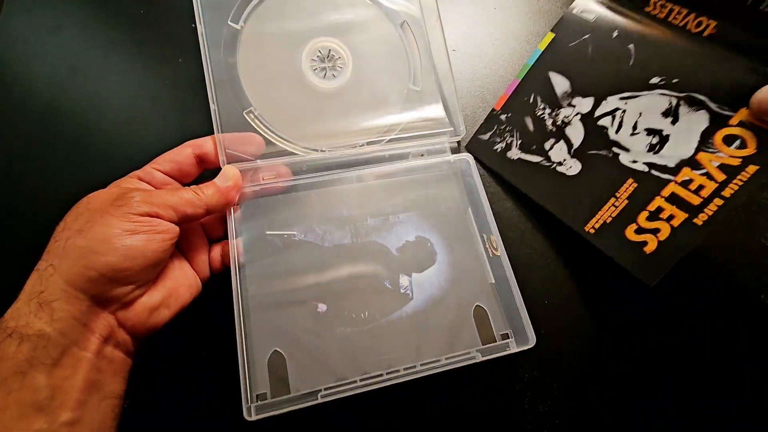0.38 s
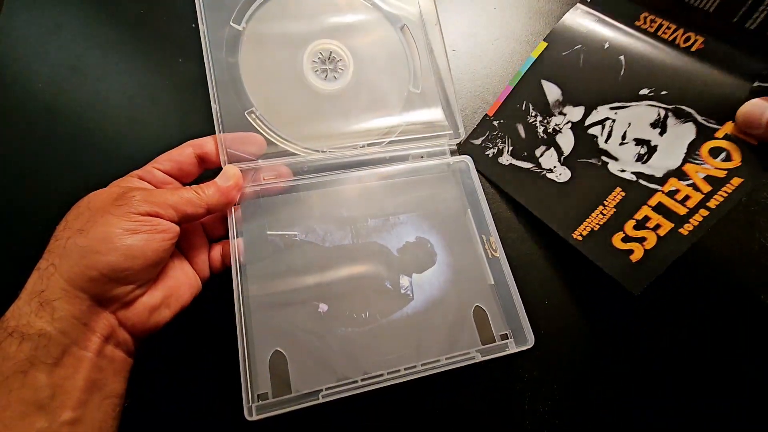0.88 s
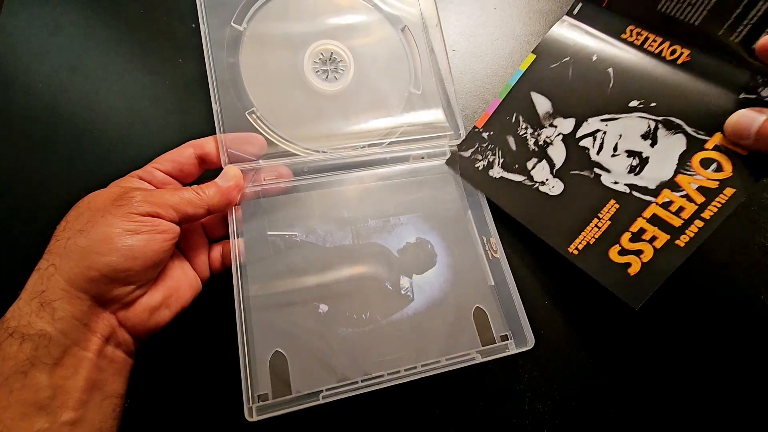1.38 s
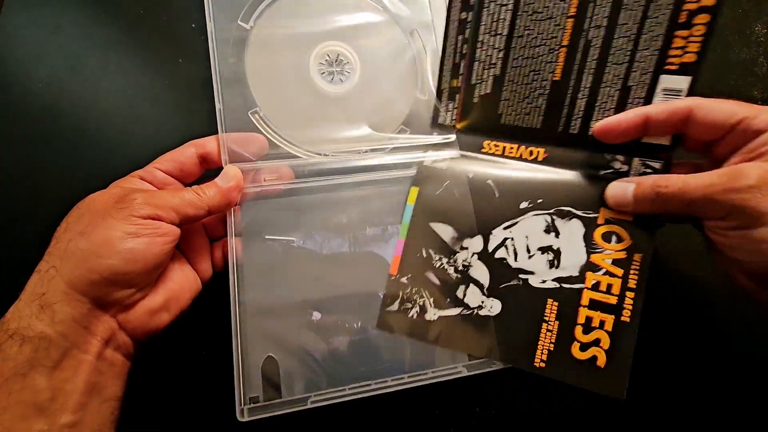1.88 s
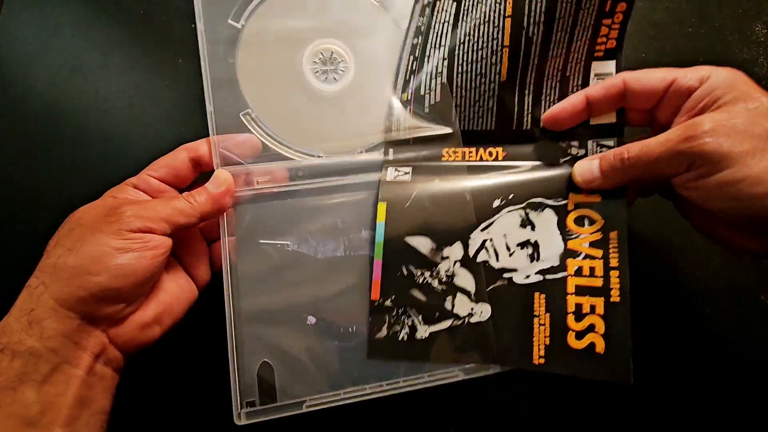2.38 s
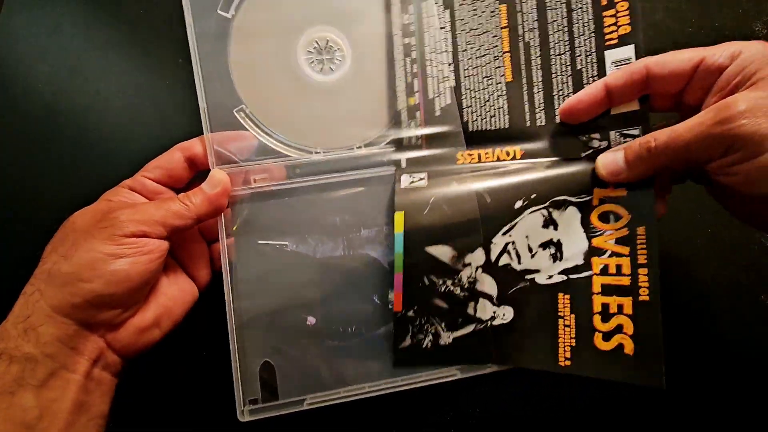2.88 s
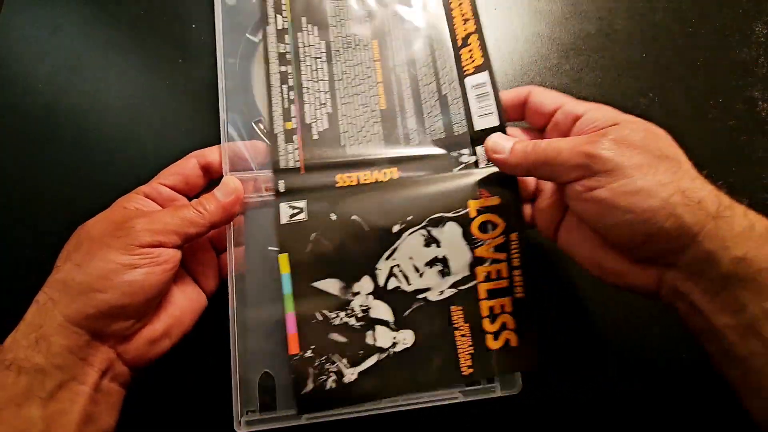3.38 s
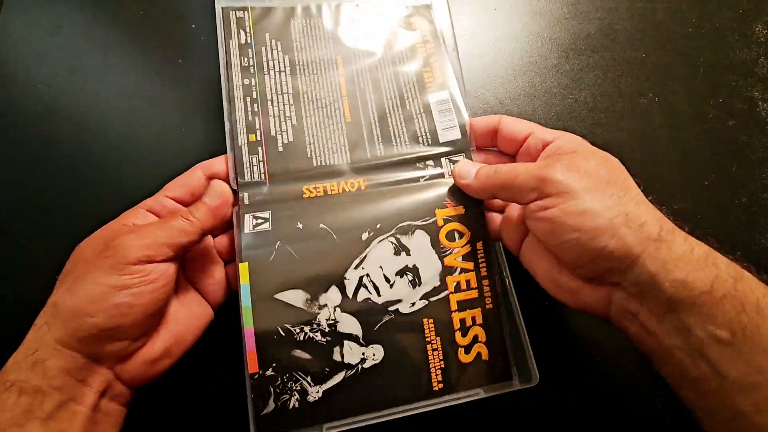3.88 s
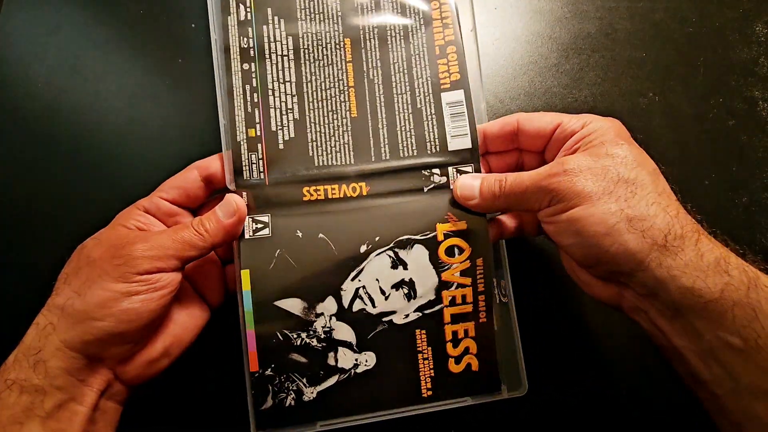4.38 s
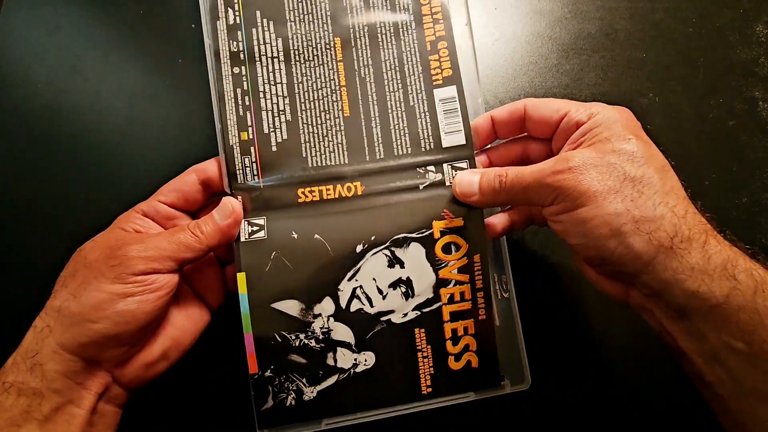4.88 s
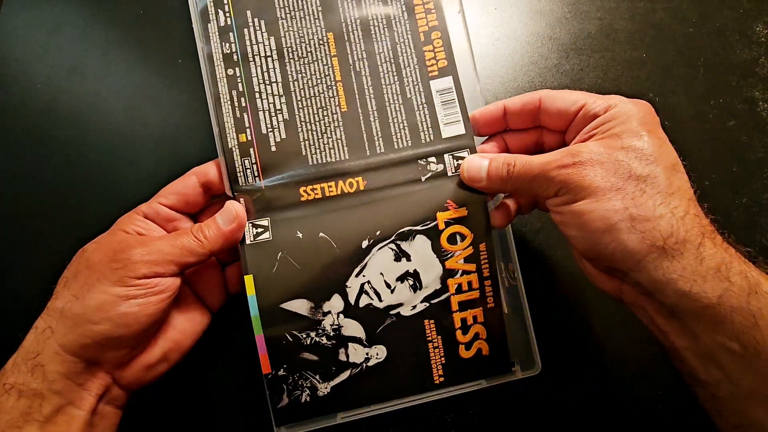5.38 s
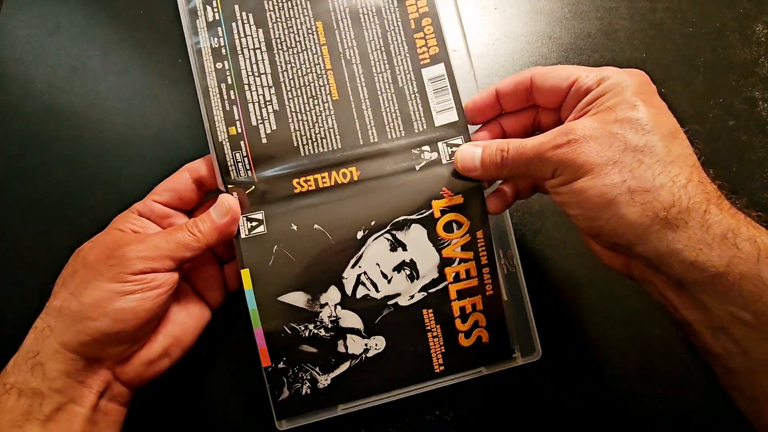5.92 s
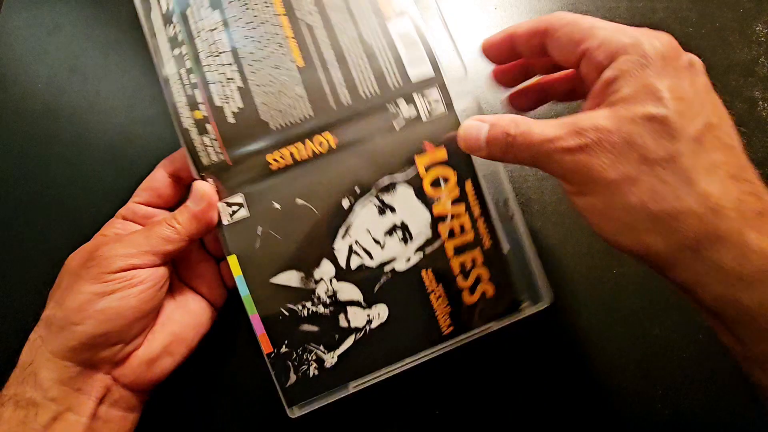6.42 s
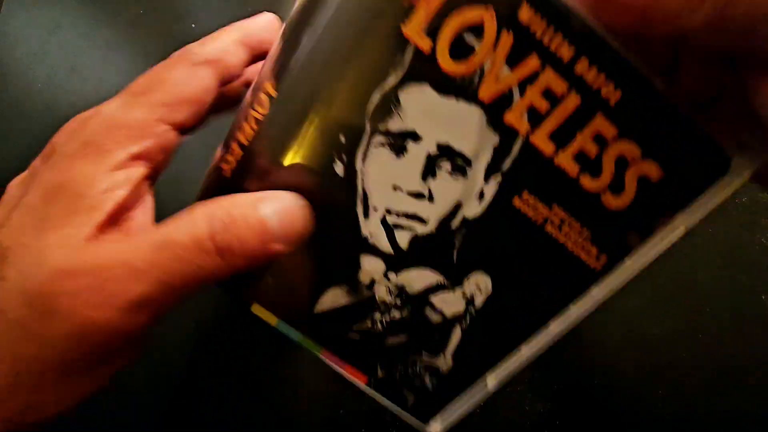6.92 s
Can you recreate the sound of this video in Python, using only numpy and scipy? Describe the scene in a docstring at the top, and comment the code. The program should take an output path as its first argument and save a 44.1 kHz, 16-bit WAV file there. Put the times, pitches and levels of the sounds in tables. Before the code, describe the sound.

A quiet small room with low airy noise, faint mains hum and a short reverberation; the plastic case is very close, in wide stereo leaning slightly left. From 0 to 1.7 s, a soft paper hiss, brief rasp and scattered small ticks sound over a faint engine hum that drops in pitch near 0.8 s and fades before 3 s. At about 1.9 s the sheet starts sliding briskly; bright swishes, scuffs and dry clicks cluster through 2.8 s. Much louder, hard plastic snaps come at 3.03 to 3.23 s, the last sharpest, with rushing paper friction until 3.6 s. A firm click at 3.94 s leads to soft rubbing. From 4.5 to 6.3 s only faint strokes, tiny ticks and a weak low drone remain. Clicks gather from 6.4 s, with a hollow knock and low thump near 6.8 s and a rough scuff at 6.93 s.

```python
"""A glossy sheet is slid under the clear sleeve of a plastic disc case, held close to a stereo microphone.
At first the sheet hisses and rasps by friction, over a rumble and the harmonics of an engine slowing down.
Clicks, resonances of the case struck by brief forces, crowd together after 2 s and peak from 3 to 4 s.
Then come sparse strokes and a faint drone; from 6.3 s clicks and scuffs gather again until the end.
A quiet room lies behind it all: low-pitched air noise, mains hum, surface bounces and a short reverberation."""
import sys
import numpy as np
from scipy import signal
from scipy.fft import rfft, irfft
from scipy.io import wavfile
from scipy.ndimage import uniform_filter1d

SR = 44100
rng = np.random.default_rng(int(sys.argv[2]) if len(sys.argv) > 2 else 0)


def transcribe(signal):
    """Save signal, clipped to [-1, 1], as a 16-bit WAV file at the path in sys.argv[1]."""
    frames = np.atleast_2d(signal).T
    limited = np.clip(frames, -1, 1)
    pcm = np.round(limited * 32767).astype(np.int16)
    wavfile.write(sys.argv[1], SR, pcm)


def field_ratio(decibels):
    """Amplitude ratio for a level in dB (20 dB per decade); scalars and array-likes work."""
    return 10 ** (np.asarray(decibels, dtype=float) / 20)


N = 310023  # samples

# Spectrum of the room's air noise: frequency_hz, density_db (relative, per Hz)
AIR_SPECTRUM = [(15, -43), (30, -4), (55, 2), (92, -7), (123, -4), (141, -16), (195, -13.5), (229, -7.5),
                (293, -14.5), (354, -17.5), (560, -23), (860, -30), (1700, -41), (3000, -46.5), (5000, -49),
                (7000, -64), (16000, -80)]
# Left-right likeness of the room noise: frequency_hz, likeness (0 to 1)
AIR_LIKENESS = [(60, 0.99), (240, 0.89), (950, 0.072), (3770, 0.085), (15000, 0.0045)]
AIR_DB, AIR_PAN_DB = -52, 1.26  # rms level before panning; left over right
# Low rumble through the hands and the building: time_s, level_db
RUMBLE_LEVEL = [(0.0, -51), (0.49, -58), (0.8, -60), (1.72, -60.5), (2.15, -48), (2.74, -56), (3.21, -52),
                (3.5, -75.5), (4.68, -78), (6.72, -78), (6.83, -48), (7.03, -55.5)]
# Spectrum of that rumble: frequency_hz, density_db (relative, per Hz)
RUMBLE_SPECTRUM = [(70, -16), (140, 14), (250, 14.5), (400, -2.5), (700, -39)]
MAINS_HZ, MAINS_DB = 120.8, -60
# Lowest cycle of a distant engine slowing down: time_s, cycle_hz
ENGINE_SPEED = [(0, 28), (.7, 28.1), (.95, 26.22), (2.5, 23.76), (3, 23.75)]
# Multiples of that cycle that reach the room, one per row of ENGINE_TONES: multiple (no unit)
ENGINE_MULTIPLES = [5, 6, 7, 8, 9, 3, 7, 2, 10, 11]
# When and how strongly each multiple sounds: start_s, end_s, level_db
ENGINE_TONES = [(0.072, 0.74, -57), (0.058, 0.84, -70), (.1, 0.65, -69), (.2, 0.684, -62),
                (0, 0.653, -58.5), (.75, 2.54, -51), (0.84, 2.89, -61.5), (1.4, 2.24, -53.5), (1, 1.6, -63),
                (1.9, 2.2, -57)]
# One faint later drone: start_s, end_s, first_pitch_hz, last_pitch_hz, level_db
LATE_DRONE = (4.5, 6.5, 222.5, 228.5, -62)
DRONE_WAVER_DB = 1.5  # rms wander of the engine tones and the drone
# Reverberation time of the room: frequency_hz, t60_s
ROOM_DECAY = [(300, 0.25), (700, 0.12), (1800, 0.14), (4600, 0.24), (12000, 0.23)]
# Table and nearby surfaces: delay_ms, level_db (against the direct sound)
BOUNCES = [(4.6, -21), (9.2, -13), (21., -24.5)]
# The case bows in the hand and pushes air: start_s, pitch_hz, peak_db, length_s
BOWS = [(.92, 81.4, -39, 0.078), (6.661, 69.6, -32, 0.051), (6.828, 97, -41, 0.042)]
# An edge catches and drags: start_s, length_s, level_db (rms before the taper), centre_hz, width_hz
SCUFFS = [(0.612, 0.051, -58, 1100, 850), (1.37, 0.031, -48, 830, 1510), (1.409, 0.38, -58.5, 1580, 500),
          (1.359, 0.013, -51.5, 900, 1200), (1.881, 0.095, -49.5, 340, 195),
          (3.172, 0.025, -45, 1007, 1203), (6.803, 0.094, -45, 330, 350), (1.938, 0.1, -42, 3400, 1800),
          (2.023, 0.028, -36, 676, 895), (2.222, 0.061, -45.5, 880, 776), (2.328, 0.043, -48, 1090, 1510),
          (2.759, 0.028, -39, 840, 880), (2.783, 0.012, -38, 1100, 1100), (2.823, 0.0048, -49, 4750, 1497),
          (2.854, 0.029, -41, 1100, 1200), (3.38, 0.034, -46.5, 1100, 1620),
          (6.725, 0.032, -48.5, 2290, 2500), (6.926, 0.032, -38.5, 600, 1175),
          (6.93, 0.018, -36.5, 2860, 2440)]
# Left-right likeness of the wide case: frequency_hz, likeness (0 to 1)
CASE_LIKENESS = [(200, 0.88), (640, 0.85), (1400, 0.3), (3000, .2), (7000, 0.15)]
# Where the case is held: time_s, right_lag_ms (negative: the right side hears it earlier)
HOLD_LAG = [(0, 0), (2.1, -.07), (3.2, -.05), (3.22, .09), (3.9, .3), (5., .27), (6.3, .15), (6.8, .05),
            (7.03, .05)]
# Clicks: contact_s, snap_peak_db, knock_db and tick_db (both against the snap), snap_centre_hz
CLICKS = [(0.0135, -33.5, -16, 1.5, 2600), (.0464, -43, -4, -28, 2560), (0.538, -38, -7, 1.5, 1570),
          (.9262, -50.5, 8.5, -22, 1630), (1.0836, -47.5, -3, -24, 2870), (1.2086, -39, -3, -3.5, 1580),
          (1.277, -48.5, 5, 10, 1415), (1.3666, -37.5, 4.5, 7, 1810), (1.8882, -34, 4.5, -6, 2070),
          (1.9246, -33.5, -1.5, 2.5, 1660), (2.144, -30, 1.5, -26, 2080), (2.161, -34.5, -0.5, -8, 3930),
          (2.1983, -34, 4, -6, 3280), (2.2224, -30.5, 3, 12, 1940), (2.236, -45, 17.5, -25, 1540),
          (2.2717, -31, -1.5, 2, 3000), (2.317, -29, -6, -16, 3200), (2.362, -36, 3, -25, 2300),
          (2.5317, -30, -3.5, 0.5, 2900), (2.5847, -32, -1.5, -33, 1930), (2.6793, -41.5, 0.5, -24, 2330),
          (2.987, -39.5, -1.5, 4, 3360), (3.0323, -16.5, -7, -13, 3180), (3.0637, -12.5, -2, -2, 1580),
          (3.1929, -12, -4, -44, 2130), (3.2281, -4.5, -7.5, 0, 2152), (3.8703, -39, -21.5, -4, 1556),
          (3.887, -42, -13, -20, 1940), (3.9369, -16.5, -0.5, -9, 1620), (4.058, -26.5, -5.5, -38, 1640),
          (4.143, -35.5, -0.5, -26, 1630), (4.7722, -46.5, -11.5, -32, 1473),
          (4.9518, -53.5, -4, 6.5, 1960), (4.9835, -38, -15, -6.5, 3490),
          (5.206, -37.5, -35.5, -22.5, 1560), (5.5564, -45.5, 3, -11.5, 2000),
          (6.3066, -50.5, -21.5, -7.5, 2180), (6.3835, -24.5, -17.5, -6.5, 2882),
          (6.4204, -18, -7, -17, 2230), (6.456, -27.5, -10, -11, 3020), (6.4918, -31, -8, -34, 3240),
          (6.5422, -38, -3.5, -11, 2400), (6.6033, -45, -7, -31.5, 2740), (6.655, -35, -12, -35, 2980),
          (6.673, -36, -4, -25, 3730), (6.7129, -45, 5.5, -13, 1840), (6.8036, -16.5, 7, -6.5, 1860),
          (6.8661, -24.5, -6.5, -4, 3260), (6.8902, -31, -8, -6, 3180), (6.9929, -34.5, -9, 2, 3070),
          (7.0122, -32, -21, -25, 3000)]
# Mean modes of the plastic case: pitch_hz, level_db, t60_s
CASE_MODES = [(433, -19, 0.06), (553, -17.5, 0.035), (592.6, -7, 0.016), (830, -5.5, 0.067),
              (1100, -3.5, 0.04), (1400, -2.5, 0.012), (1460, -15.5, 0.012), (2130, -13, 0.015),
              (2600, -14, 0.0018), (3200, -4, .008), (4400, -2, 0.01), (5563, -5, .006), (6910, -13, .005)]
SHIVER_DB, SHIVER_T60_S = -4, 0.048  # small modes of walls and sleeve, too dense to tell apart
CONTACT_MS, CRACK_DB = 0.6, 38.5  # decay constant of the force; bare contact ahead of the ringing
THUD_DB = -14  # low push through the hands, against the knock
LEAD = 60  # samples kept free ahead of each contact
CLICK_PAN_DB, PAN_SCATTER_DB = 5, 3  # mean left over right, and its spread
# Spectrum of the paper hiss: frequency_hz, density_db (relative, per Hz)
HISS_SPECTRUM = [(1500, -31.5), (2800, -4), (4000, 3), (6000, 0.5), (8000, 1), (10500, -8.5), (12000, -5.5),
                 (14000, -9.5), (16300, -12.5)]
# Spectrum of the wall rasp: frequency_hz, density_db (relative, per Hz)
RASP_SPECTRUM = [(250, -29.5), (450, -14), (800, -10.5), (1600, -14.5), (2600, -16.5), (5000, -43.5)]
# The sheet dragging along inside the sleeve: time_s, hiss_db, rasp_db
DRAG = [(0, -67, -70), (.35, -90, -85), (.55, -77, -71), (.8, -105, -103), (1.05, -78.5, -76),
        (1.3, -85.5, -78), (1.45, -74.5, -66), (1.58, -62.5, -58), (1.69, -49, -64), (1.85, -48, -51),
        (2.12, -64.5, -59.5), (2.3, -62, -57), (2.43, -61, -56), (2.62, -61, -61), (2.94, -58, -59.5),
        (3.12, -48, -51), (3.31, -46.5, -51.5), (3.6, -51.5, -61), (3.64, -62.5, -58), (3.8, -75.5, -71.5),
        (4., -75, -56), (4.15, -89, -70.5), (4.77, -89, -74), (5.4, -100, -81.5), (6.28, -100, -78),
        (6.33, -76, -74), (6.45, -66.5, -66), (6.8, -78, -79), (7.03, -59, -50.5)]
# Single pushes of the sheet: peak_s, swell_s, fade_s, hiss_db, rasp_db
STROKES = [(0.02, 0.076, .12, -56.5, -55.5), (0.21, 0.061, 0.058, -44.5, -57),
           (0.657, 0.17, 0.049, -69.5, -72), (0.916, 0.017, 0.043, -63, -57.5),
           (1.05, 0.099, 0.045, -66.5, -73), (1.131, 0.075, .055, -61.5, -56),
           (1.929, 0.0041, 0.25, -40, -44.5), (2.022, 0.075, 0.025, -32, -81),
           (2.182, 0.033, 0.052, -41.5, -61), (2.366, 0.092, 0.052, -44, -73),
           (2.541, 0.54, 0.042, -62, -62.5), (2.777, 0.1, 0.018, -51, -60),
           (2.823, 0.0063, 0.056, -35, -57.5), (3.233, 0.003, 0.12, -42.5, -50),
           (3.878, 0.046, 0.21, -57, -58.5), (4.24, 0.1, 0.027, -52, -62), (4.34, 0.05, 0.1, -56, -64),
           (4.575, 0.083, 0.091, -62.5, -60.5), (4.99, .4, .1, -73, -77.5), (5.212, .05, .13, -71, -65.5),
           (6.548, 0.033, 0.043, -68, -71.5), (6.662, 0.02, 0.085, -70, -81.5),
           (6.736, .06, 0.031, -51, -51), (6.881, 0.2, 0.094, -54, -52), (6.941, 0.031, 0.068, -47, -44)]
STROKE_DB = 25  # rise over one swell_s, fall over one fade_s
JOLT_HISS_DB, JOLT_HISS_FADE_S = -25, 0.04  # sheet jolted by a click, against its tick
JOLT_RASP_DB, JOLT_RASP_FADE_S = -24, 0.065  # walls jolted by a click, against its knock
JOLT_DELAY_S = 0.002  # from the click to the peak of its jolt
SLIDE_PAN_DB = 1.5  # left over right
EDGE_HZ = 15900  # upper band limit


def evened(x):
    """Normalises a signal to unit rms."""
    return x / np.sqrt(np.mean(x ** 2) + 1e-20)


def read(points, hz):
    """Interpolates a spectrum table linearly along a logarithmic frequency axis."""
    f, value = np.transpose(points)
    return np.interp(np.log(hz + 1), np.log(f + 1), value)


def add(mix, s, sound):
    """Superposes a sound on the mix from time s."""
    part = mix[:, round(s * SR):][:, :sound.shape[-1]]
    part += sound[..., :part.shape[1]]


def sides(pan_db):
    """Places a source by intensity stereo: a column of left and right gains."""
    return field_ratio([pan_db / 2, -pan_db / 2])[:, None]


def correlated(left, other, alike):
    """Sets interchannel coherence by blending an independent spectrum into the right side."""
    return np.array([left, alike * left + np.sqrt(1 - alike ** 2) * other])


def noise(spectrum, likeness, patchy_db, size):
    """Shapes random short-time spectra into stereo noise whose level drifts in small patches."""
    frames, hz = 4 * N // size + 5, np.fft.rfftfreq(size, 1 / SR)
    a, b, c, d, patches = rng.standard_normal((frames, len(hz), 5)).T
    patches = uniform_filter1d(patches, size=5, axis=0)  # across frequency
    patches = evened(uniform_filter1d(patches, size=24, axis=1))  # across time
    alike = np.clip(read(likeness, hz), -1, 1)[:, None]
    spectra = correlated(a + 1j * b, c + 1j * d, alike)
    spectra = spectra * field_ratio(read(spectrum, hz)[:, None] + patchy_db * patches)
    sound = signal.istft(spectra, nperseg=size, noverlap=size * 3 // 4)[1]
    return evened(sound[:, :N])


def drone(start, end, hz, db, waver):
    """Integrates the pitch curve hz into phase: a wavering tone that fades in and out."""
    a, b = round(start * SR), round(end * SR)
    tone = np.sin(2 * np.pi * np.cumsum(hz[a:b]) / SR) * signal.windows.tukey(b - a, 0.2)
    own_waver = np.roll(waver, rng.integers(N))[a:b]
    return start, np.sqrt(2) * field_ratio(db + DRONE_WAVER_DB * own_waver) * tone


def room_tone():
    """Superposes broadband air noise and rumble with the periodic tones of mains and engine."""
    t = np.arange(N) / SR
    out = field_ratio(AIR_DB) * noise(AIR_SPECTRUM, AIR_LIKENESS, patchy_db=1.5, size=4096)
    rumble = noise(RUMBLE_SPECTRUM, AIR_LIKENESS, patchy_db=8.0, size=2048)
    out += field_ratio(np.interp(t, *np.transpose(RUMBLE_LEVEL))) * rumble
    waver = uniform_filter1d(rng.standard_normal(N), size=3000)
    waver = evened(uniform_filter1d(waver, size=3000))
    out += field_ratio(MAINS_DB + 0.56 * waver) * np.sqrt(2) * np.sin(2 * np.pi * MAINS_HZ * t)
    engine_hz = np.interp(t, *np.transpose(ENGINE_SPEED))
    for multiple, (start, end, db) in zip(ENGINE_MULTIPLES, ENGINE_TONES):
        add(out, *drone(start, end, multiple * engine_hz, db, waver))
    start, end, first_hz, last_hz, db = LATE_DRONE
    add(out, *drone(start, end, np.interp(t, (start, end), (first_hz, last_hz)), db, waver))
    return out * sides(AIR_PAN_DB)


def room(x):
    """Reverberation by sparse reflections of random sign, each band decaying at its own rate."""
    taps = np.zeros((2, SR // 2))
    at = np.arange(150, SR // 2 - 20, 20)
    at = at + rng.integers(0, 20, (2, len(at)))
    np.put_along_axis(taps, at, rng.choice([-1., 1.], at.shape), 1)
    hz, t, spectra = signal.stft(taps, SR, nperseg=128)
    decay = field_ratio(-60 * t / read(ROOM_DECAY, hz)[:, None])
    tail = signal.istft(spectra * decay, SR, nperseg=128)[1]
    return signal.fftconvolve(x, tail / np.linalg.norm(tail[0]), axes=1)[:, :N]


def bows():
    """Volume displacement: the flexing case pushes a few slow cycles of air."""
    out = np.zeros((2, N))
    for s, hz, db, length in BOWS:
        t = np.arange(round(length * SR)) / SR
        add(out, s, field_ratio(db) * np.hanning(len(t)) * np.sin(2 * np.pi * hz * t))
    return out


def scuffs():
    """Stick-slip: a quick run of slips filtered by one broad resonance of the dragging edge."""
    out = np.zeros((2, N))
    for s, length, db, centre_hz, width_hz in SCUFFS:
        n = round(length * SR)
        hz = np.fft.rfftfreq(n, 1 / SR)
        alike = np.clip(read(CASE_LIKENESS, hz) + 0.037, 0, 1)
        left, other = rfft(rng.standard_normal((2, n)))
        resonance = 1 / (1 + ((hz - centre_hz ** 2 / (hz + 1)) / width_hz) ** 2)
        slips = irfft(resonance * correlated(left, other, alike), n)
        add(out, s, field_ratio(db) * evened(slips) * signal.windows.tukey(n, 0.4))
    return out * sides(SLIDE_PAN_DB)


def contact_force(t):
    """Impact excitation: spectra of two brief rattles of force with a flattened envelope."""
    force = rng.standard_normal((2, len(t))) * np.exp(-1000 * t / CONTACT_MS)
    force *= np.minimum(t / 0.00021, 1)  # quick onset
    spectrum = rfft(np.roll(force, LEAD, axis=1))
    return spectrum / uniform_filter1d(abs(spectrum), size=60)  # a hard contact pushes evenly at all pitches


def case_ring(t):
    """Modal superposition: decaying modes of the case, detuned and reweighted by each grip."""
    ring = field_ratio(SHIVER_DB - 60 * t / SHIVER_T60_S) * rng.standard_normal(len(t))
    for hz, db, t60 in CASE_MODES:
        level_shift, detune = rng.standard_normal(2)
        decay = field_ratio(db + 2 * level_shift - 60 * t / t60)
        ring += decay * np.cos(2 * np.pi * hz * (1 + 0.04 * detune) * t)
    ring[0] += field_ratio(CRACK_DB)
    return ring


def bandpass(low_hz, high_hz):
    """Second-order Butterworth resonance between two edge frequencies."""
    return signal.butter(2, (low_hz, high_hz), "band", fs=SR, output="sos")


def clicks():
    """Convolves contact force with case ringing and weighs it in bands: thud, knock, snap and tick."""
    t, out = np.arange(3072) / SR, np.zeros((2, N))
    alike = np.clip(read(CASE_LIKENESS, np.fft.rfftfreq(len(t), 1 / SR)) + 0.5, 0, 1)
    thud, knock, tick = bandpass(40, 360), bandpass(560, 1600), bandpass(3200, 7500)
    for s, snap_db, knock_db, tick_db, snap_hz in CLICKS:
        pan = sides(CLICK_PAN_DB + PAN_SCATTER_DB * rng.standard_normal())
        left, other = contact_force(t) * rfft(case_ring(t))
        both = irfft(correlated(left, other, alike))
        bands = [(thud, snap_db + knock_db + THUD_DB), (knock, snap_db + knock_db),
                 (bandpass(snap_hz / 1.3, snap_hz * 1.3), snap_db), (tick, snap_db + tick_db)]
        for band, db in bands:
            part = signal.sosfilt(band, both)
            part = part / abs(part).max(1)[:, None]  # unit peak on each side
            add(out, s - LEAD / SR, field_ratio(db) * pan * part)
    return out


def push(s, swell_s, fade_s, db):
    """Exponential growth and decay of friction: start time and gains of one push peaking at s."""
    start = max(s - 2 * swell_s, 0)
    t = np.arange(start - s, 2 * fade_s, 1 / SR)
    drop_db = STROKE_DB * np.where(t < 0, -t / swell_s, t / fade_s)
    return start, field_ratio(np.array(db)[:, None] - drop_db)


def friction():
    """Sums the gains of hiss and rasp from slow drag, single pushes and a jolt after every click."""
    time, *columns = np.transpose(DRAG)
    level = field_ratio([np.interp(np.arange(N) / SR, time, column) for column in columns])
    for s, swell_s, fade_s, *db in STROKES:
        add(level, *push(s, swell_s, fade_s, db))
    for s, snap_db, knock_db, tick_db, _ in CLICKS:
        peak_s, swell_s = s + JOLT_DELAY_S, JOLT_DELAY_S / 2
        add(level[:1], *push(peak_s, swell_s, JOLT_HISS_FADE_S, [snap_db + tick_db + JOLT_HISS_DB]))
        add(level[1:], *push(peak_s, swell_s, JOLT_RASP_FADE_S, [snap_db + knock_db + JOLT_RASP_DB]))
    return level


def grit(smooth_s, depth_db):
    """Uneven grip: amplitude modulation by quick random jumps in contact force."""
    jumps = uniform_filter1d(rng.exponential(1, N) ** 3, size=max(2, round(smooth_s * SR)))
    return evened(field_ratio(depth_db * np.clip(evened(jumps - jumps.mean()), -3, 3)))


def slide():
    """Sliding friction of paper on plastic: fine hiss of the sheet, lumpier rasp of the walls."""
    hiss_gain, rasp_gain = friction()
    sheet = noise(HISS_SPECTRUM, CASE_LIKENESS, patchy_db=1.5, size=256)
    treble = signal.sosfilt(signal.butter(2, 10500, "high", fs=SR, output="sos"), sheet)
    # louder hiss is brighter, as when the sheet slides faster
    treble_db = np.clip(0.06 * (20 * np.log10(hiss_gain) + 53), -15, 8)
    sheet = sheet + (field_ratio(treble_db) - 1) * treble
    hiss = hiss_gain * grit(0.0065, depth_db=2.8) * sheet
    walls = noise(RASP_SPECTRUM, CASE_LIKENESS, patchy_db=2.5, size=512)
    rasp = rasp_gain * grit(0.008, depth_db=1.5) * walls
    return (hiss + rasp) * sides(SLIDE_PAN_DB)


def placed(x):
    """Interaural-style time difference: lags the right side by the path difference to the ports."""
    at = np.arange(N)
    lag_ms = np.interp(at / SR, *np.transpose(HOLD_LAG))
    late = np.round(lag_ms * SR / 1000).astype(int)
    return np.array([x[0], x[1][np.clip(at - late, 0, N - 1)]])


def scene():
    """Superposes direct sound, early reflections, reverberation and the background."""
    hits = clicks() + scuffs()
    near = hits + slide()
    for delay_ms, db in BOUNCES:
        add(near, delay_ms / 1000, field_ratio(db) * hits)
    return placed(near) + field_ratio(-12.5) * room(hits) + bows() + room_tone()


def roll_off(x):
    """The treble ends steeply here."""
    return signal.sosfilt(signal.butter(12, 16650, fs=SR, output="sos"), x)


def record(dry):
    """Limits the bandwidth with a linear-phase low-pass filter."""
    lowpass = signal.firwin(255, EDGE_HZ, window=("kaiser", 4), fs=SR)
    limited = signal.oaconvolve(dry, lowpass[None], "same")
    return roll_off(limited)


dry = scene()
out = record(dry)
transcribe(out)
```